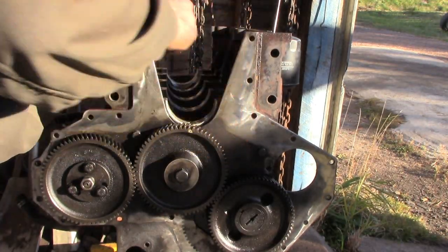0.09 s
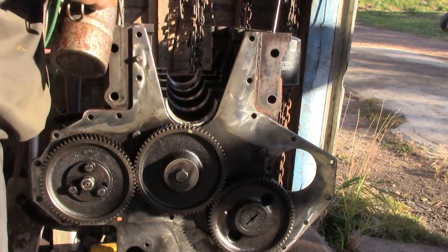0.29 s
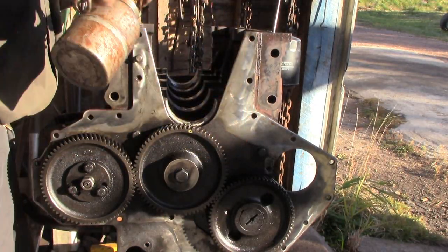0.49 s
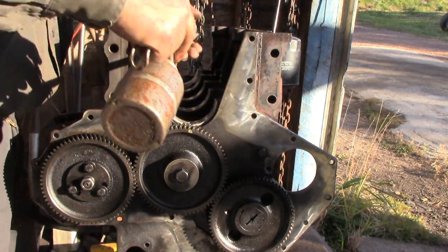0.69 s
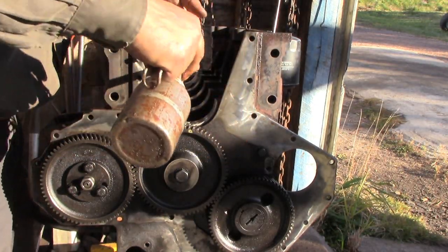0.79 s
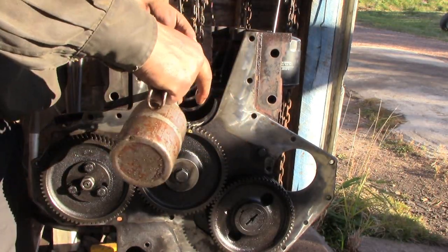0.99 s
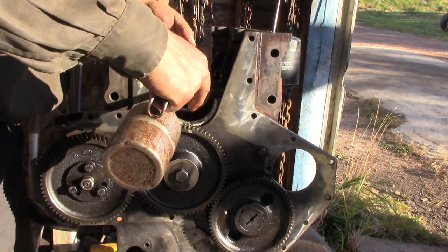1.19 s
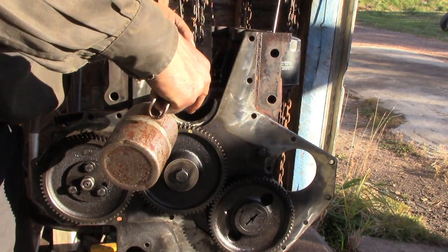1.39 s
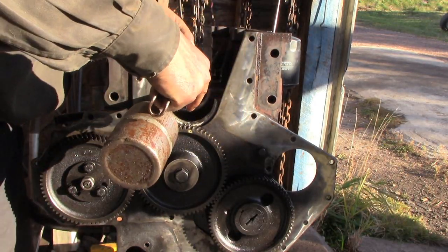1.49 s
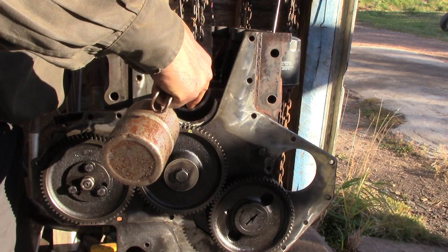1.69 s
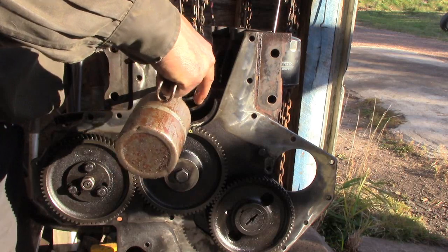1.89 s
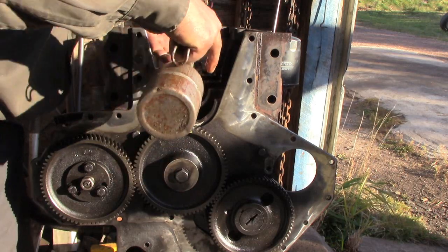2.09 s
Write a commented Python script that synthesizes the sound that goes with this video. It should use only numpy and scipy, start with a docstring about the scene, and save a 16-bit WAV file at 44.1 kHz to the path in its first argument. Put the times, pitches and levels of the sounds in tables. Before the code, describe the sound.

A metal oil can clinks, drags over rough casting with faint ticks, and ends with a knock

```python
"""Oil can at an engine block

An oil can is handled at an engine block by an open workshop door, close to a stereo microphone. Its spout
clinks on steel and its bottom knocks: decaying modes with a crack and a rattle of noise. It drags over the
casting (dense grit clicks in a broad band) and ticks faintly (noise bursts). Under it lie a short room tail,
low outdoor air, a faint hollow hum and microphone hiss, all shaped noise."""
import sys
import numpy as np
from scipy import signal
from scipy.fft import rfft, irfft
from scipy.io import wavfile
from scipy.ndimage import uniform_filter1d

SR = 44100
rng = np.random.default_rng(int(sys.argv[2]) if len(sys.argv) > 2 else 0)


def volts_from_db(level):
    """Convert decibel levels to linear amplitude ratios."""
    exponent = np.asarray(level, float) / 20
    return 10 ** exponent


def put_to_file(sound):
    """Save the sound as 16-bit audio at rate SR, in the file named by the first command-line argument."""
    columns = np.atleast_2d(sound).T  # one column per channel
    safe = np.clip(columns, -1, 1)
    whole_steps = np.round(safe * 32767)
    wavfile.write(sys.argv[1], SR, whole_steps.astype(np.int16))


N = 94815  # length of the scene in samples

# Contacts of the spout and of the can's bottom: t/s, level/dB
CLINKS = [(.2063, -33.5)]
KNOCKS = [(1.8326, -34), (1.83635, -38)]
# Modes of the spout: f/Hz
SPOUT_HZ = [578, 2697, 2727, 2875, 3676, 4457, 4554, 5080, 5140, 5420, 5706, 5800, 5870, 6440, 7140, 7220,
            7700, 8075, 8900]
# Their ring after a clink: level/dB, t60/s, for some also the shift/Hz once the spout rests on the steel
SPOUT_RING = [(-21, .3), (.5, .55, 30), (-9, .2), (-3.5, .9, -21), (-24, .25), (-17, .12), (-16, .25, -15),
              (-1.5, .28, -5), (-5, .1), (-8, .3, -20), (-14, .1), (-2, .14), (-3, .1), (-19, .5, -15),
              (-19, .22), (-9, .18), (-25, 1), (-19, .2), (-26, .2)]
# Modes of the can's bottom: f/Hz
BOTTOM_HZ = [787, 1346, 1520, 2200, 2687, 2665, 2933, 4356, 4955, 5665, 7400, 8300, 10410]
# Their ring after a knock: level/dB, t60/s
BOTTOM_RING = [(-.5, .125), (-15, .1), (-3, .03), (3, .02), (6, .018), (-19, .22), (8, .016), (-10, .07),
               (-13, .03), (-4, .025), (-10, .03), (-8, .05), (-12, .04)]
# Spectra of the crack at a clink and at a knock: f/Hz, level/dB
CLINK_CRACK = [(150, -30), (500, -14), (950, -13), (1350, -3), (1900, -12), (4000, -9), (6000, 0),
               (9000, -14), (14000, -24)]
KNOCK_CRACK = [(200, -35), (450, 0), (1100, -12), (2600, 7), (3600, -25), (8000, -7), (11000, -12),
               (14000, -35)]
# Spectrum of the loose buzz after a blow: f/Hz, level/dB
RATTLE = [(2000, -7), (4000, -19), (5500, -9.5), (8200, -10), (10500, -18), (13000, -30)]
# The touch as the spout settles on the steel: t/s, level/dB
REST_TOUCH = [(.2625, -52)]
# Treble modes that this touch wakes: f/Hz
REST_HZ = [5706, 5870, 8095, 8900]
# Their ring: level/dB, t60/s
REST_RING = [(-1, .2), (2, .08), (3, .07), (-4, .06)]
# How hard the can rubs, one list per stroke: t/s, level/dB
DRAG_STROKES = [
    [(0, -51.5), (.03, -54.5), (.07, -62.5), (.09, -65)],
    [(.24, -57), (.37, -62), (.42, -55), (.435, -51.5), (.475, -46), (.54, -47.5), (.592, -49),
     (.63, -56.5), (.7, -63)],
    [(.7, -66.5), (.856, -60.5), (1.0, -67.5), (1.12, -65), (1.25, -104)],
]
# Broad spectrum of the grit under the drag: f/Hz, level/dB (per Hz)
DRAG_BROAD = [(200, -6.5), (500, -4), (1200, -6.5), (2400, -3), (4000, -3), (6500, -5.5), (10000, -13.5),
              (12500, -21), (15000, -64)]
# Resonances that sing under pressure: f/Hz, width/Hz, level/dB
DRAG_PEAKS = [(1930, 260, 2), (2930, 300, 0), (3600, 200, -6), (4650, 300, -3), (5130, 450, 0)]
# Faint ticks and taps of the can in the hand: t/s, level/dB, f/Hz, width/Hz, length/s
TICKS = [(0.007, -55.5, 2672, 150, 0.038), (.098, -53.5, 271, 120, 0.076), (.1, -57.5, 610, 298, 0.057),
         (0.304, -54, 3080, 600, 0.014), (0.469, -42.5, 4830, 900, .008), (0.1, -59, 4300, 1520, 0.036),
         (0.133, -58.5, 4100, 2600, 0.074), (0.4256, -49, 3900, 1200, 0.018),
         (0.4822, -35, 4000, 4700, 0.0025), (0.5145, -45, 4900, 2000, .01), (.6535, -51, 3830, 1500, 0.018),
         (.96, -56, 480, 193, 0.082), (1.28, -57, 2400, 3700, 0.037), (1.327, -53.5, 3200, 3130, .012),
         (1.4886, -60, 1520, 300, 0.013), (1.6353, -52, 2160, 610, 0.0048), (1.636, -56, 4300, 500, 0.011),
         (1.797, -53.5, 2440, 1200, 0.024), (1.81, -52.5, 2730, 1420, 0.038),
         (1.8296, -40, 1900, 900, 0.004), (1.8415, -42, 2700, 700, .004)]
# Spectra of the outdoor wash and of the low rumble: f/Hz, level/dB (per Hz)
AIR = [(12, -46), (20, 2), (140, -12), (293, -19.5), (452, -21), (631, -25), (774, -26), (999, -26.5),
       (1580, -30), (2150, -30), (9000, -38.5), (11700, -90), (19800, -120)]
RUMBLE = [(30, -5), (60, -0.5), (95, 5), (130, -11.5), (200, -17), (400, -69)]
# Swell of the rumble: t/s, level/dB
GUST = [(0, -59.5), (.35, -67.5), (.55, -60.5), (.68, -52), (.75, -70.5), (1.05, -59.5), (1.4, -67.5),
        (2.15, -61)]
# Level of the hollow hum: t/s, level/dB
HUM = [(0.0, -63.5), (0.32, -72), (0.65, -67), (0.93, -69), (1.77, -66), (2.15, -69.5)]
# Spectrum of the microphone hiss: f/Hz, level/dB (per Hz)
HISS = [(100, 2.5), (1000, -3.5), (5000, -5), (10000, -9), (15500, -13)]

MODE_STEP_RAD = 2.2  # each mode starts this much behind its lower neighbour in the table
RISE_CYCLES = 1.4  # modes build up over their own cycles, so low ones come later
GRIP_DB_PER_KHZ, GRIP_S = 2.2, 0.1  # the hand closes and damps the spout, by the cube of time
REST_S, REST_GLIDE_S = 0.05, 0.006  # after the clink the spout settles and its modes shift
CLINK_CRACK_DB, KNOCK_CRACK_DB, CRACK_T60_S = 10, 5, 0.011
RATTLE_DB, RATTLE_T60_S = -12.5, 0.22
NOISE_RISE_S = 0.00021  # onset of crack and rattle
GRIT_PER_S = 9000
GRIT_SPREAD_DB = 2  # per natural-log step of chance: a few clicks come out large
CLUMP_DB, CLUMP_S = 1.6, 0.004  # the grit catches in clumps
PEAKS_DB = -5
SING_DB = -50  # rubbing level above which the resonances sing fully
CAN_LOW_HZ, TICK_LOW_HZ = 252, 152  # low cuts of the blows and of the ticks
CAN_TOP_HZ = 12800  # high cut of the can at the microphone
SHOP_DB, SHOP_T60_S, SHOP_TOP_HZ = -18.5, 0.087, 7800
AIR_DB, HISS_DB = -55, -62
HUM_HZ, HUM_WIDTH_HZ = 735, 160
LAG_S = 0.000023  # the left port hears later


def evened(x):
    """Brings a signal to an rms of 1."""
    return x / np.sqrt(np.mean(x ** 2) + 1e-20)


def coloured(x, points):
    """Filters by a spectrum of f/Hz, level/dB points, joined along log frequency."""
    f, level = np.transpose(points)
    hz = np.fft.rfftfreq(x.shape[-1], 1 / SR)
    gain = volts_from_db(np.interp(np.log(hz + 1), np.log(f + 1), level))
    return irfft(rfft(x) * gain, x.shape[-1])


def resonate(x, hz, width_hz):
    """Two equal resonances in a row, each a decaying complex pole with a gain of about 1 at its peak."""
    r = np.exp(-np.pi * width_hz / SR)
    pole = r * np.exp(2j * np.pi * hz / SR)
    for _ in range(2):
        x = 2 * signal.lfilter([1 - r], [1, -pole], x).real
    return x


def curve(points):
    """Gain over the whole scene from t/s, level/dB points, practically silent outside them."""
    s, level = np.transpose(points)
    return volts_from_db(np.interp(np.arange(N) / SR, s, level, -99, -99))


def add(mix, s, sound):
    """Lays a sound into the mix at time s, cut off at the end of the scene."""
    part = mix[round(s * SR):][:len(sound)]
    part += sound[:len(part)]


def ringing(t, hzs, modes, grip_db):
    """Struck metal: a sum of decaying sine modes, neighbours out of step, some gliding in pitch."""
    rested = REST_GLIDE_S * np.logaddexp(0, (t - REST_S) / REST_GLIDE_S)  # time since settling, soft start
    ring = np.zeros(len(t))
    for k, (hz, (db, t60, *shift)) in enumerate(zip(hzs, modes)):
        grip = grip_db * hz / 1e3 * (t / GRIP_S) ** 3
        fade = volts_from_db(db - 60 * t / t60 - grip)
        rise = 1 - np.exp(-t * hz / RISE_CYCLES)
        cycles = hz * t + sum(shift) * rested
        ring += fade * rise * np.sin(2 * np.pi * cycles - k * MODE_STEP_RAD)
    return ring


def struck(contacts, hzs, modes, crack, crack_db, grip_db=0):
    """Each contact rings the modes, with a short crack of noise and a longer loose rattle."""
    t, out = np.arange(SR // 2) / SR, np.zeros(N)
    ring = ringing(t, hzs, modes, grip_db)
    for s, db in contacts:
        crack_noise, rattle_noise = rng.standard_normal((2, len(t)))
        snap = evened(coloured(crack_noise, crack)) * volts_from_db(crack_db - 60 * t / CRACK_T60_S)
        buzz = evened(coloured(rattle_noise, RATTLE)) * volts_from_db(RATTLE_DB - 60 * t / RATTLE_T60_S)
        onset = np.minimum(t / NOISE_RISE_S, 1)
        add(out, s, volts_from_db(db) * (ring + (snap + buzz) * onset))
    return out


def drag():
    """Dense grit clicks through a broad band; the can's resonances sing only under pressure."""
    chance, side, size = rng.random((3, N))
    clicks = (chance < GRIT_PER_S / SR) * np.sign(side - 0.5)
    grit = clicks * volts_from_db(-GRIT_SPREAD_DB * np.log(size + 0.0086))
    clumps = rng.standard_normal(N)
    for _ in range(2):
        clumps = uniform_filter1d(clumps, size=round(CLUMP_S * SR))
    grit = grit * volts_from_db(CLUMP_DB * evened(clumps))
    body = evened(coloured(grit, DRAG_BROAD))
    peaks = sum(volts_from_db(db) * evened(resonate(grit, hz, width)) for hz, width, db in DRAG_PEAKS)
    press = sum(curve(stroke) for stroke in DRAG_STROKES)
    singing = np.minimum(press / volts_from_db(SING_DB), 1)
    return press * (body + volts_from_db(PEAKS_DB) * evened(peaks) * singing)


def ticks():
    """Short bursts of resonant noise: quick rise, bell-shaped fade over their length."""
    out = np.zeros(N)
    for s, db, hz, width_hz, length_s in TICKS:
        u = np.arange(6000) / SR / length_s  # time in lengths of the tick
        noise = evened(resonate(rng.standard_normal(6000), hz, width_hz))
        envelope = np.minimum(u / 0.15, 1) * np.exp(-(1.3 * u) ** 2)
        add(out, s, volts_from_db(db) * noise * envelope)
    return signal.lfilter(*signal.butter(2, TICK_LOW_HZ, "high", fs=SR), out)


def ports(x):
    """The two microphone ports: one sound, a little later on the left."""
    z, hz = rfft(x), np.fft.rfftfreq(N, 1 / SR)
    left = irfft(z * np.exp(-2j * np.pi * hz * LAG_S), N)
    return np.array([left, x])


def shop(x):
    """A short dull tail of reflections: decaying noise, slightly different in each channel."""
    t = np.arange(SR // 2) / SR
    tail = rng.standard_normal((2, len(t))) * volts_from_db(-60 * t / SHOP_T60_S) * (t > 0.004)
    tail = 3.1 * tail[0] + 0.16 * tail  # mostly shared by the channels
    tail = signal.lfilter(*signal.butter(1, SHOP_TOP_HZ, fs=SR), tail)
    tail = tail / np.linalg.norm(tail[0])
    return volts_from_db(SHOP_DB) * signal.fftconvolve(x[None], tail, axes=1)[:, :N]


def air():
    """Low outdoor wash, a rumble that swells, and a fuzzy hollow hum of noise in a narrow resonance."""
    wash = volts_from_db(AIR_DB) * evened(coloured(rng.standard_normal(N), AIR))
    rumble = curve(GUST) * evened(coloured(rng.standard_normal(N), RUMBLE))
    hum = curve(HUM) * evened(resonate(rng.standard_normal(N), HUM_HZ, HUM_WIDTH_HZ))
    return wash + rumble + hum


def hiss():
    """Microphone hiss: shaped noise, independent in each channel."""
    return volts_from_db(HISS_DB) * evened(coloured(rng.standard_normal((2, N)), HISS))


def scene():
    """Blows, drag and ticks of the can at both ports, with the shop's tail and the air under them."""
    clink = struck(CLINKS, SPOUT_HZ, SPOUT_RING, CLINK_CRACK, CLINK_CRACK_DB, GRIP_DB_PER_KHZ)
    settling = struck(REST_TOUCH, REST_HZ, REST_RING, CLINK_CRACK, 0)
    knock = struck(KNOCKS, BOTTOM_HZ, BOTTOM_RING, KNOCK_CRACK, KNOCK_CRACK_DB)
    blows = signal.lfilter(*signal.butter(2, CAN_LOW_HZ, "high", fs=SR), clink + settling + knock)
    can = blows + drag() + ticks()
    can = signal.lfilter(*signal.butter(4, CAN_TOP_HZ, fs=SR), can)
    return ports(can) + shop(can) + ports(air())


def band_limit(x):
    """A steep low-pass at the top of the band."""
    return signal.sosfilt(signal.butter(12, 15620, fs=SR, output="sos"), x)


def record(dry):
    """Adds each microphone's own hiss to the scene."""
    return band_limit(dry + hiss())


dry = scene()
out = record(dry)
put_to_file(out)
```